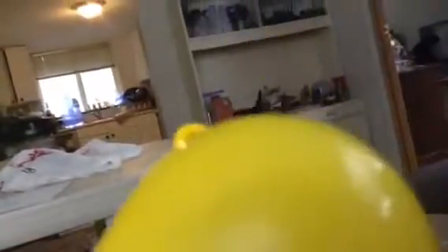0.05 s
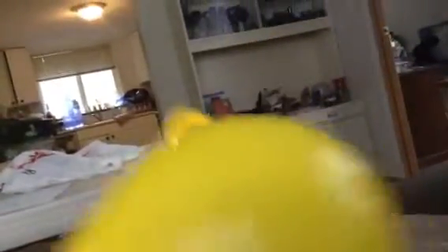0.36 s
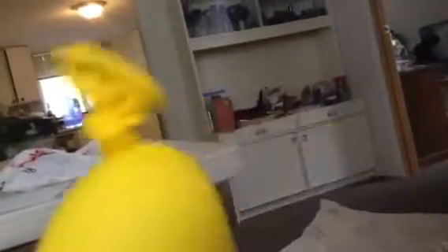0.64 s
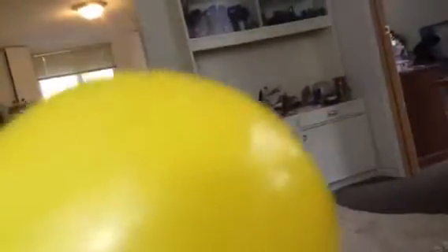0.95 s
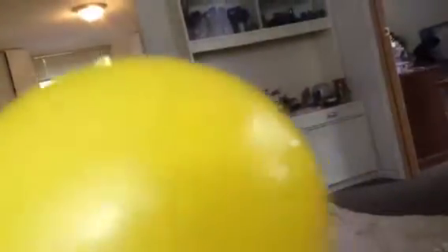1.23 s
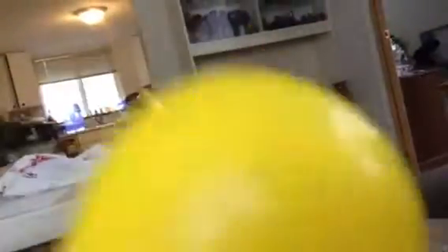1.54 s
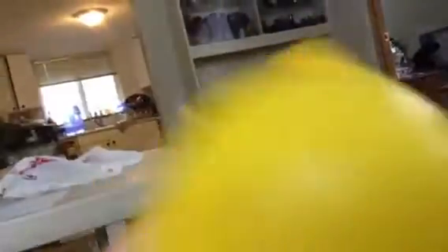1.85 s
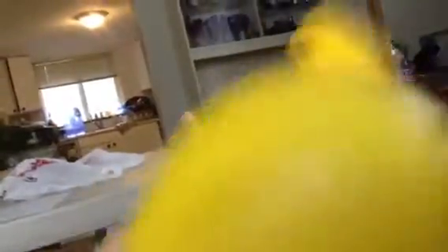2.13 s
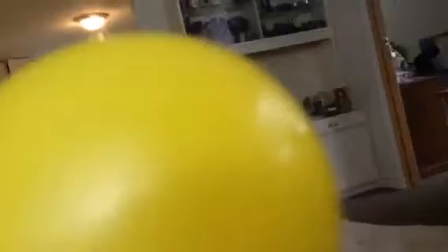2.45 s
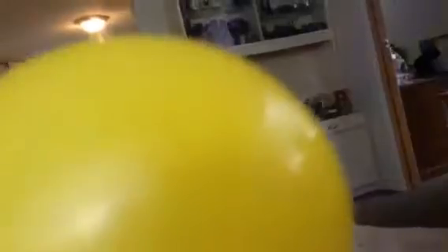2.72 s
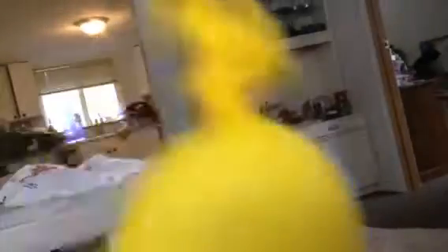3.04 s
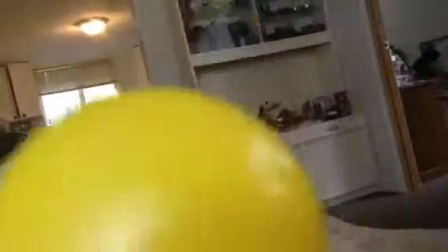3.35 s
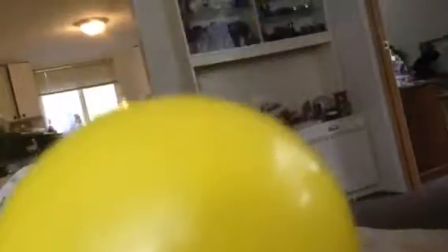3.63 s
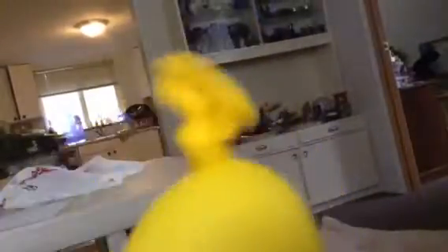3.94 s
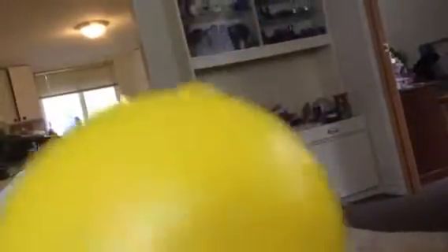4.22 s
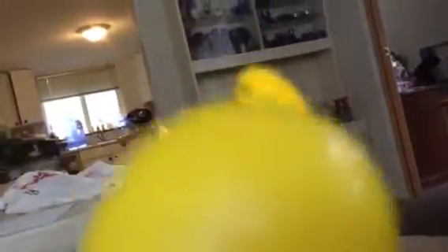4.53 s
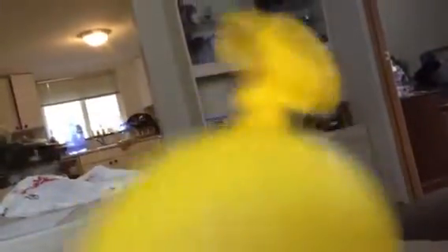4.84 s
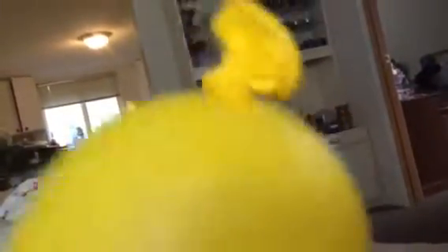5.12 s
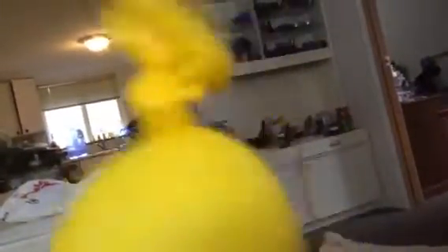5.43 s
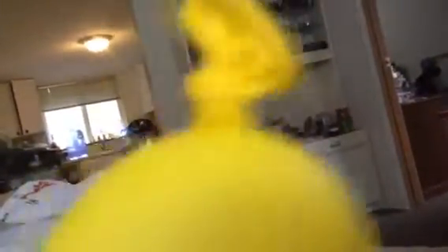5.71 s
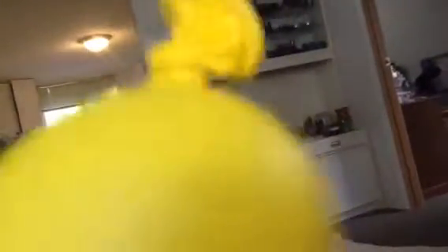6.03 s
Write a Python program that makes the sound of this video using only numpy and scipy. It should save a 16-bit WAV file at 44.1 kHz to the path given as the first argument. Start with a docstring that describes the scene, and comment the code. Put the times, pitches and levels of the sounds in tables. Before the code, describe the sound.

A rubber balloon with small beads inside is shaken and turned by hand, very close to the microphone in a quiet room. After faint finger bumps, the beads roll and land with a hollow thud, then hard shakes spray and smack them against the taut skin. A few more widely spaced turns follow, with dull bumps and stray ticks between. A run of quick shakes ends it, growing fainter as the beads roll to rest.

```python
"""A rubber balloon with small beads inside, shaken and turned in the hand close to the microphone.
Over the murmur of a quiet room, fingers bump the rubber and a stray bead ticks. Half a second in, the
heap rolls and lands with a hollow thud; then hard shakes spray and smack beads against the taut skin.
From three seconds the turns come further apart, with bumps and ticks between them. After four seconds
a run of quick shakes follows, growing fainter until the beads roll to rest."""
import sys
import numpy as np
from scipy import signal
from scipy.fft import rfft, irfft
from scipy.io import wavfile
from scipy.ndimage import map_coordinates

SR = 44100
rng = np.random.default_rng(int(sys.argv[2]) if len(sys.argv) > 2 else 0)


def wav_out(sig):
    """Save sig, one row per channel (or a flat mono array), as 16-bit PCM at SR to the path in sys.argv[1]."""
    wavfile.write(sys.argv[1], SR, np.round(np.clip(np.atleast_2d(sig).T, -1, 1) * 32767).astype(np.int16))


N = 272097
BINS_HZ = np.maximum(np.arange(1025) * SR / 2048, 1)

# Levels are relative within each table.
# Fingers bump the balloon. Each row: start in seconds, level in dB.
FINGER_BUMPS = [(0.147, -44), (0.18, -43.5), (0.893, -43), (0.944, -39.5), (1.016, -42), (1.216, -42),
                (1.905, -34.5), (2.07, -43), (3.41, -36), (3.429, -30), (3.463, -36.5), (3.504, -30.5),
                (3.518, -30.5), (3.554, -27.5), (3.573, -29.5), (3.608, -37), (3.666, -37), (3.71, -44.5),
                (3.734, -40.5), (4.337, -46), (4.415, -31)]
# Single beads tick on the skin. Each row: start in seconds, level in dB.
BEAD_TICKS = [(0.241, -51), (0.436, -22), (0.4447, -21), (0.4526, -16.5), (0.4794, -18), (0.7128, -43),
              (0.7855, -42.5), (1.0131, -27.5), (1.0194, -29), (1.321, -28), (1.3283, -29), (1.3415, -20),
              (1.3826, -11), (1.5994, -13.5), (1.767, -15.5), (1.903, -24), (1.938, -19), (1.951, -14.5),
              (2.592, -25), (2.603, -22.5), (2.6174, -24.5), (2.9876, -28.5), (3.0116, -18), (3.044, -16),
              (3.233, -35.5), (3.501, -25.5), (3.51, -15), (3.5465, -24), (3.551, -12), (3.5554, -11),
              (3.6093, -22), (3.6383, -27.5), (3.664, -30), (3.7319, -22), (3.745, -24), (3.795, -23),
              (3.8734, -24), (4.0637, -18), (4.403, -24.5), (4.597, -23.5), (4.6466, -14.5), (4.774, -12.5),
              (4.803, -26), (4.8267, -23), (5.0463, -21), (5.0816, -19.5), (5.1423, -13), (5.3655, -16),
              (5.708, -15), (5.7845, -15), (5.891, -25.5)]
# The heap rolls round inside. Each row: time of full flow in seconds, level in dB, then rise, hold and
# fall in seconds.
HEAP_ROLLS = [(0.494, -36.5, 0.07, 0.11, 0.097), (1.38, -38.5, 0.068, 0.12, 0.087),
              (1.727, -37.5, 0.057, 0.049, 0.043), (1.964, -36.5, 0.031, 0.095, 0.1),
              (2.21, -42, 0.019, 0.096, 0.051), (2.399, -46.5, 0.032, 0.057, 0.19),
              (3.04, -37, 0.041, 0.048, 0.13), (3.339, -39.5, 0.041, 0.039, 0.11),
              (3.51, -59.5, 0.044, .07, 0.6), (3.935, -36.5, 0.059, 0.083, 0.13),
              (4.229, -42.5, .025, 0.026, 0.014), (4.434, -40.5, 0.043, 0.05, 0.041),
              (4.63, -38, 0.038, 0.084, 0.065), (4.862, -38, 0.023, .11, 0.11),
              (5.079, -38, 0.027, 0.1, 0.056), (5.261, -43, 0.04, 0.019, 0.13),
              (5.359, -41, 0.022, 0.037, 0.065), (5.501, -41, 0.093, .045, 0.056),
              (5.607, -40, 0.036, 0.054, 0.024), (5.719, -40, 0.037, 0.16, 0.036),
              (5.951, -46, 0.047, 0.12, 0.022), (6.121, -43.5, 0.014, 0.05, .05)]
# A shake throws beads against the skin. Each row: time of full flow in seconds, level in dB, then rise,
# hold and fall in seconds.
BEAD_SPRAYS = [(0.59, -34, 0.026, 0.012, 0.05), (0.853, -17, 0.023, 0.021, 0.045),
               (1.555, -24, 0.051, .02, 0.054), (1.816, -21, 0.016, 0.016, 0.048),
               (2.11, -22, 0.057, 0.015, 0.029), (2.47, -17, 0.03, 0.011, 0.034),
               (3.348, -21, 0.01, .056, 0.03), (4.264, -18, 0.0064, 0.04, 0.012),
               (4.458, -27, 0.014, 0.084, 0.021), (4.708, -25.5, 0.038, 0.026, 0.052),
               (4.965, -24, 0.044, 0.026, 0.033), (5.147, -30, 0.033, .025, 0.026),
               (5.37, -32, 0.027, 0.037, 0.031), (5.617, -22, 0.012, 0.0065, 0.027),
               (5.79, -33, 0.027, 0.0026, 0.021), (5.86, -29, 0.01, .005, 0.012),
               (5.952, -40.5, 0.015, 0.0031, 0.015), (6.055, -37.5, 0.022, 0.004, 0.01)]
# A clump smacks bare rubber. Each row: start in seconds, level in dB, spread of arrivals in seconds.
CLUMP_SMACKS = [(0.503, -6, 0.0067), (0.8715, -0.5, 0.0019), (1.5835, 11, 0.0046), (1.834, 1, 0.0049),
                (2.4796, -3.5, 0.0019), (3.389, -2, 0.0031), (3.417, -5, 0.0012), (4.2928, -3, 0.0016),
                (4.3124, -9, 0.0019), (4.7633, -9, 0.0031), (4.9737, 0.5, 0.018), (5.3968, -7, 0.0017),
                (5.659, -7.5, 0.004)]
# The heap lands on the skin. Each row: time in seconds, level in dB, centre of its colour in Hz, spread
# of arrivals in seconds.
HEAP_LANDINGS = [(0.522, -9, 990, 0.014), (1.381, -20.5, 1510, 0.0052), (1.396, -8, 1290, 0.0064),
                 (1.738, -14.5, 690, 0.0045), (1.973, -13.5, 675, 0.0059), (2.224, -15, 630, 0.0064),
                 (3.082, -6.5, 704, .0063), (3.966, -11.5, 666, 0.0065), (4.451, -14, 1100, 0.009),
                 (4.632, -18, 1260, 0.011), (4.88, -14.5, 1090, 0.005), (5.053, -26.5, 1250, 0.0092),
                 (5.273, -30, 1050, 0.0036), (5.499, -23.5, 1050, 0.016), (5.724, -17.5, 1360, 0.0086),
                 (6.143, -22.5, 1300, 0.0027)]
# Modes of the balloon's skin and air. Each row: pitch in Hz, level in dB, seconds to die away by 60 dB.
BALLOON_MODES = [(225, -15, .04), (320, -15, .028), (560, -4, .028), (705, -.5, .028), (1040, -2, .018),
                 (1240, -2.5, .022), (1420, -1, .02), (1720, -5.5, .014), (2800, -8, .016),
                 (5600, -13, .008)]
# The colour of each sound from close up. Each row: frequency in Hz, level in dB.
MURMUR_COLOUR = [(30, -29), (90, -26.5), (135, -15.5), (200, -2), (290, -9), (400, -15), (600, -20.5),
                 (1100, -27.5), (2500, -34.5), (6000, -37.5), (15000, -39)]
FINGER_COLOUR = [(30, -38), (90, -31.5), (135, -12), (225, 6), (330, -3), (480, -8.5), (700, -9),
                 (1000, -21.5), (1500, -24), (3000, -29.5), (8000, -45.5)]
TICK_COLOUR = [(290, -48), (500, -9.5), (1300, -11.5), (2400, -7), (4070, -17.5), (5500, -4), (6700, -12),
               (7670, -2), (10000, -2.5), (14200, -4.5), (15500, -8)]
ROLL_COLOUR = [(40, -56.5), (150, -27), (400, -10.5), (720, -0.5), (930, -2.5), (1220, 4), (1600, 1),
               (2350, -7.5), (2700, -1.5), (3120, -0.5), (3480, -11.5), (4100, -4.5), (4500, -9.5),
               (5000, -4.5), (5800, -1.5), (7300, -7.5), (10000, -7), (15000, -16.5)]
SPRAY_COLOUR = [(40, -48.5), (300, -15), (900, -11), (1650, -1), (2050, -10.5), (2550, 0), (3300, -9.5),
                (4400, -7), (5500, 1), (6700, -3.5), (8000, 0), (10500, -1.5), (15000, -6)]
SMACK_COLOUR = [(40, -74), (300, -34.5), (900, -18.5), (1400, -12.5), (1900, 6.5), (2450, 4.5), (3200, -10),
                (4200, -8.5), (5300, 5), (6700, 0.5), (8000, -0.5), (11000, -1), (15000, -4.5)]


def from_db(db):
    """Decibels to gain."""
    return 10 ** (np.asarray(db) / 20)


def rms_one(x):
    """Scale to an rms of 1."""
    return x / np.sqrt(np.mean(x ** 2) + 1e-20)


def add(out, s, sound):
    """Mix a sound in at s seconds."""
    start = max(round(s * SR), 0)
    out[start:start + len(sound)] += sound[:max(N - start, 0)]


def through(x, pulse):
    """Pass a sound through an impulse response."""
    return signal.oaconvolve(x, pulse)[:len(x)]


def drift(per_s, size):
    """A random wander of spread about 1, with per_s turning points a second."""
    steps = np.arange(size) / SR * per_s
    return np.interp(steps, np.arange(8192), rng.standard_normal(8192)) * np.sqrt(3 / 2)


def ripple(step_hz):
    """Random peaks and dips along the frequency axis, about step_hz apart."""
    return np.interp(BINS_HZ / step_hz, np.arange(len(BINS_HZ)), rng.standard_normal(len(BINS_HZ)))


def causal_ring(gain):
    """The shortest causal impulse response with this gain in each bin; unit energy."""
    cepstrum = irfft(np.log(gain))
    half = len(cepstrum) // 2
    cepstrum[1:half] *= 2
    cepstrum[half + 1:] = 0
    pulse = irfft(np.exp(rfft(cepstrum)))
    return pulse / np.linalg.norm(pulse)


def response(colour, uneven_db=0, step_hz=250):
    """The ring of a body of this colour, with random peaks and dips of about uneven_db."""
    hz, level_db = np.transpose(sorted(colour))
    smooth_db = np.interp(np.log(BINS_HZ), np.log(hz), level_db)
    return causal_ring(from_db(smooth_db + uneven_db * ripple(step_hz)))


def contacts(per_s, spread_db, size):
    """Random contacts: many faint ones, a few strong; rms 1 however many there are."""
    touches = rng.random(size) < per_s / SR
    strength = from_db(spread_db * np.minimum(rng.exponential(1, size), 4))
    return rms_one(touches * strength * rng.choice([-1, 1], size) / np.sqrt(np.minimum(per_s, SR)))


def clump(arrive_s, per_s, size=4096):
    """A burst of contacts that swells quickly and thins out; unit energy."""
    progress = np.arange(size) / SR / arrive_s
    hits = contacts(per_s, spread_db=.82, size=size) * np.sqrt(progress) * np.exp(-2 * progress)
    return hits / (np.linalg.norm(hits) + 1e-12)


def room_murmur(gain_db=-56.5):
    """The low steady murmur of the room, far under the balloon."""
    return from_db(gain_db) * through(rng.standard_normal(N), response(MURMUR_COLOUR))


def finger_bumps(gain_db=-8, slip_s=.015):
    """A fingertip pushes the balloon and slips a little: a dull low knock."""
    out, body = np.zeros(N), response(FINGER_COLOUR)
    for s, db in FINGER_BUMPS:
        force = clump(slip_s, per_s=1500)
        force[0] += 1   # the push
        add(out, s, from_db(db + gain_db) * rms_one(through(force, body)))
    return out


def room_tail(x, wet_db=-23.5, t60_s=.29, first_echo_s=.006, wall_cut_hz=7000):
    """A faint diffuse tail reaches the microphone after the trip to the nearest surfaces."""
    age = np.arange(SR // 2) / SR
    tail = rng.standard_normal(len(age)) * from_db(-60 * age / t60_s) * (age > first_echo_s)
    tail = signal.sosfilt(signal.butter(1, wall_cut_hz, fs=SR, output="sos"), tail)
    return from_db(wet_db) * through(x, tail / np.linalg.norm(tail))


def bead_ticks(gain_db=-25, chatter_s=.0009):
    """Stray beads chatter on the skin for about a millisecond, each with its own colour."""
    out = np.zeros(N)
    for s, db in BEAD_TICKS + loose_beads():
        chatter = clump(chatter_s, per_s=20000)
        skin = response(TICK_COLOUR, uneven_db=2.5, step_hz=1160)
        add(out, s, from_db(db + gain_db) * rms_one(through(chatter, skin)))
    return out


def loose_beads(lift_db=10, scatter_s=.017, vary_db=2.5, count=4):
    """Each roll knocks a few faint beads loose. Each row: start in seconds, tick level in dB."""
    return [(s + rng.uniform(-scatter_s, hold_s + scatter_s), db + lift_db + vary_db * rng.normal())
            for s, db, _, hold_s, _ in HEAP_ROLLS for _ in range(count)]


def swell_db(age, rise_s, hold_s, fall_s, swing_db=20, settle_db=-27, settle_db_per_s=188.5):
    """A flow builds by swing_db in rise_s, holds, drops as far in fall_s and leaves beads settling."""
    before, after = np.maximum(-age, 0), np.maximum(age - hold_s, 0)
    building_db = -swing_db * (before / rise_s) ** 1.5
    dying_db = np.maximum(-swing_db * after / fall_s, settle_db - settle_db_per_s * after)
    return np.maximum(building_db + dying_db, -70)


def wandering_contacts(per_s, spread_db=2.5, spots=6):
    """Beads wander between several spots in the balloon; each spot has its own pitches."""
    size = len(per_s)
    colours = from_db([10 * ripple(step_hz=1400) for _ in range(spots)])
    colours /= np.linalg.norm(colours, axis=0)
    shares = from_db([3.5 * drift(per_s=45, size=size) for _ in range(spots)])
    shares /= np.linalg.norm(shares, axis=0)
    return sum(through(share * contacts(per_s / spots, spread_db, size), causal_ring(colour))
               for share, colour in zip(shares, colours))


def pitch_arch(x, age, middle_s, sag, half_s=.09):
    """The air resonances are highest in the middle of a roll and sag by a share towards both ends."""
    speed = 1 - sag * np.minimum(((age - middle_s) / half_s) ** 2, 1)
    place = np.cumsum(speed)
    place += (middle_s - age[0]) * SR - np.interp(middle_s, age, place)   # the middle stays on time
    return map_coordinates(x, [place], order=3)


def flowing_beads(flows, colour, gain_db=0, sag=0, surge_db=3, lead_s=.12):
    """Beads roll in a heap or spray on the skin in small surges; a stronger flow has more contacts."""
    out, age = np.zeros(N), np.arange(SR // 2) / SR - lead_s
    for s, db, rise_s, hold_s, fall_s in flows:
        flow_db = db + swell_db(age, rise_s, hold_s, fall_s)
        hits = wandering_contacts(per_s=5000 * from_db(.4 * (flow_db + 34.5)))
        cavity = response(colour, uneven_db=1.9)   # each shake: a new shape, so new air resonances
        rattle = pitch_arch(through(hits, cavity), age, hold_s / 2, sag)
        surges_db = surge_db * drift(per_s=130, size=len(age))
        add(out, s - lead_s, rattle * from_db(flow_db + gain_db + surges_db))
    return out


def clump_smacks(gain_db=-31):
    """Clumps of beads thrown against bare rubber crack brightly."""
    out, skin = np.zeros(N), response(SMACK_COLOUR)
    for s, db, arrive_s in CLUMP_SMACKS:
        force = clump(arrive_s, per_s=31000)
        add(out, s, from_db(db + gain_db) * rms_one(through(force, skin)))
    return out


def heap_landings(gain_db=-18, grip_detune=.02, grip_vary_db=1.5, focus_db=5, lead_s=.006):
    """The heap lands and rings the skin and air with a hollow thud; the grip retunes them each time."""
    out, age = np.zeros(N), np.arange(4096) / SR
    hz, mode_db, t60_s = np.transpose(BALLOON_MODES)[:, :, None]
    lead = round(lead_s * SR)
    soften = signal.butter(1, [150, 4500], "band", fs=SR, output="sos")
    for s, db, centre_hz, arrive_s in HEAP_LANDINGS:
        stretch, strength = rng.standard_normal((2, len(hz), 1))
        octaves_off = np.minimum(np.abs(np.log2(hz / centre_hz)), 1)   # the blow favours nearby modes
        start_db = mode_db + grip_vary_db * strength - focus_db * octaves_off
        gripped_hz = hz * (1 + grip_detune * stretch)
        modes = from_db(start_db - 60 * age / t60_s) * np.cos(2 * np.pi * gripped_hz * age)
        early_beads = from_db(-12) * clump(arrive_s, per_s=7000)
        stragglers = 1.56 * np.roll(clump(arrive_s, per_s=6000), lead)
        force = early_beads + stragglers
        force[lead] += 1   # the heap as one blow
        thud = through(signal.sosfilt(soften, force), modes.sum(axis=0))
        add(out, s - lead / SR, from_db(db + gain_db) * rms_one(thud))
    return out


def scene():
    """One microphone close to the balloon, the quiet room well behind it."""
    sprays = flowing_beads(BEAD_SPRAYS, SPRAY_COLOUR)
    rolls = flowing_beads(HEAP_ROLLS, ROLL_COLOUR, gain_db=2, sag=.065)
    balloon = sprays + rolls + heap_landings() + clump_smacks() + bead_ticks() + finger_bumps()
    return (balloon + room_tail(balloon) + room_murmur())[None]


def record(dry, ceiling=.75, low_cut_hz=70, top_cut_hz=15500):
    """A soft ceiling keeps the loudest peaks in range; the microphone drops the deep bass, the top is cut
    steeply."""
    rounded = dry / (1 + (dry / ceiling) ** 6) ** (1 / 6)
    thinned = signal.sosfilt(signal.butter(1, low_cut_hz, "high", fs=SR, output="sos"), rounded)
    top_cut = signal.firwin(255, top_cut_hz, window=("kaiser", 9), fs=SR)
    return signal.oaconvolve(thinned, top_cut[None], "same")


dry = scene()
out = record(dry)
wav_out(out)
```